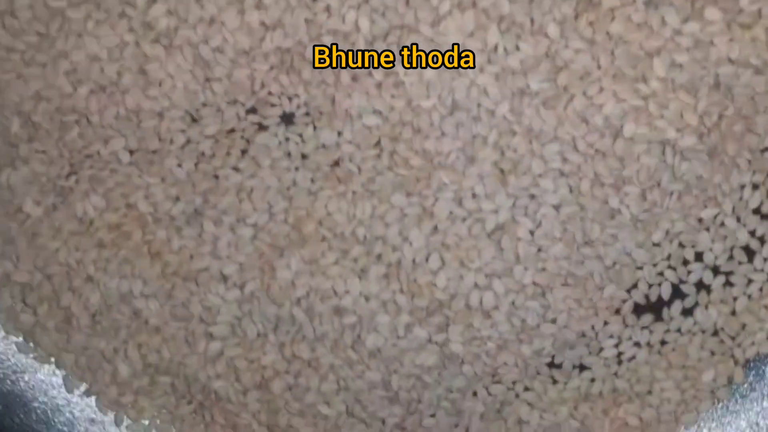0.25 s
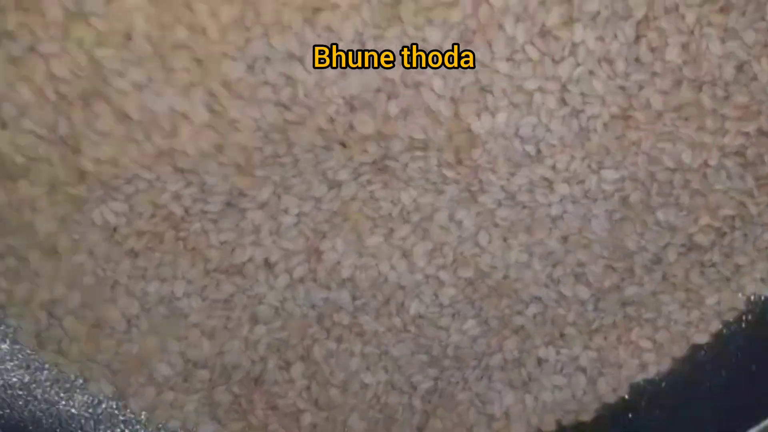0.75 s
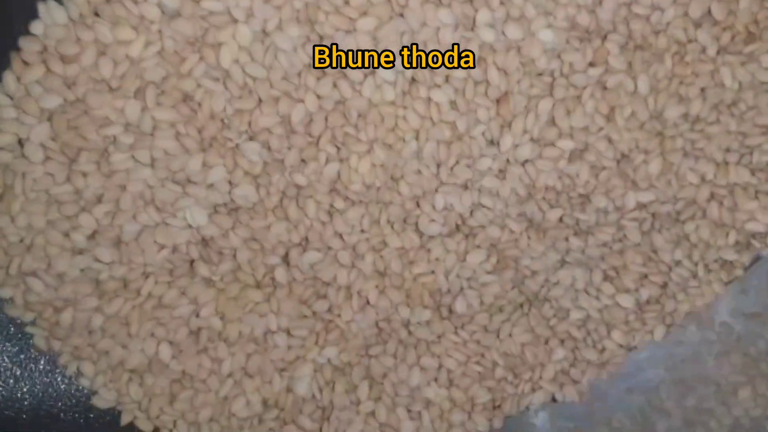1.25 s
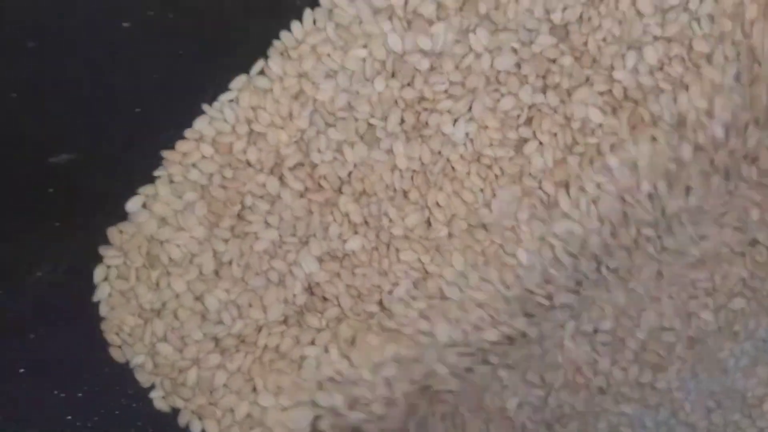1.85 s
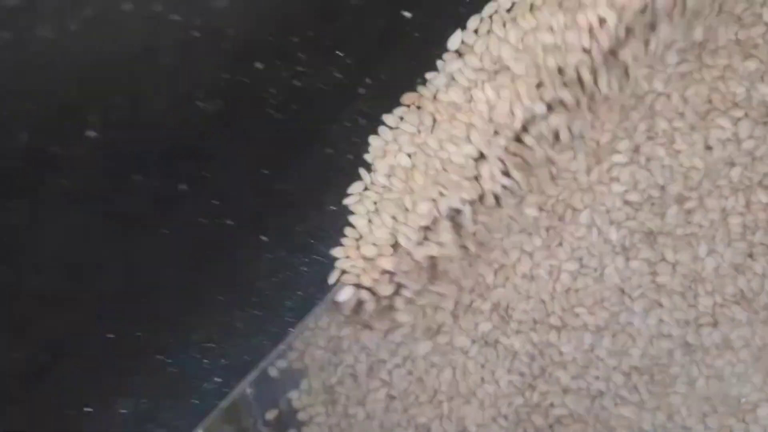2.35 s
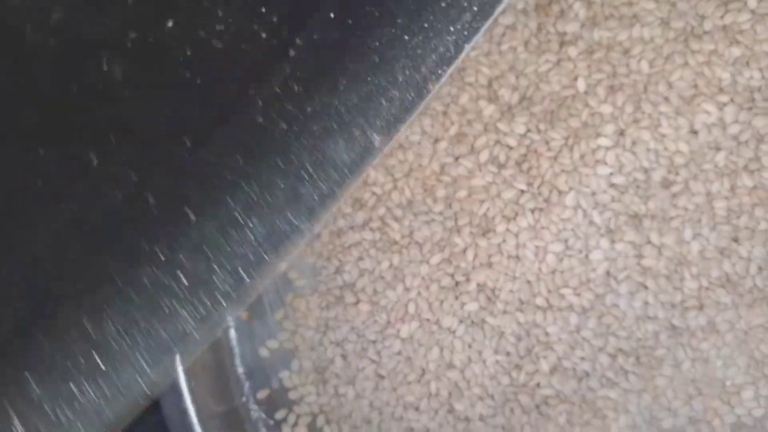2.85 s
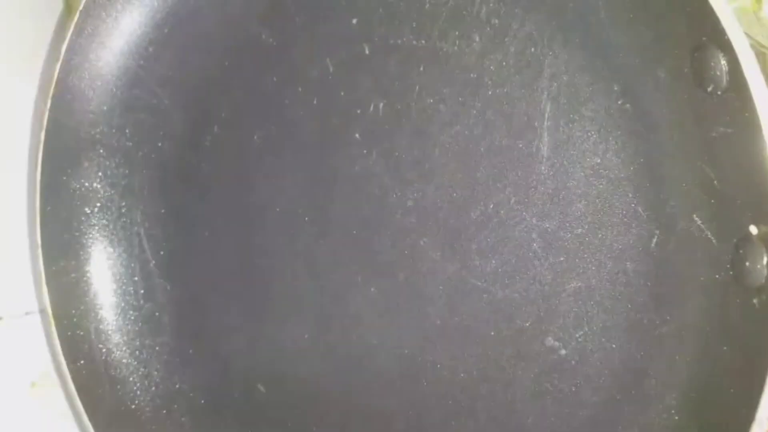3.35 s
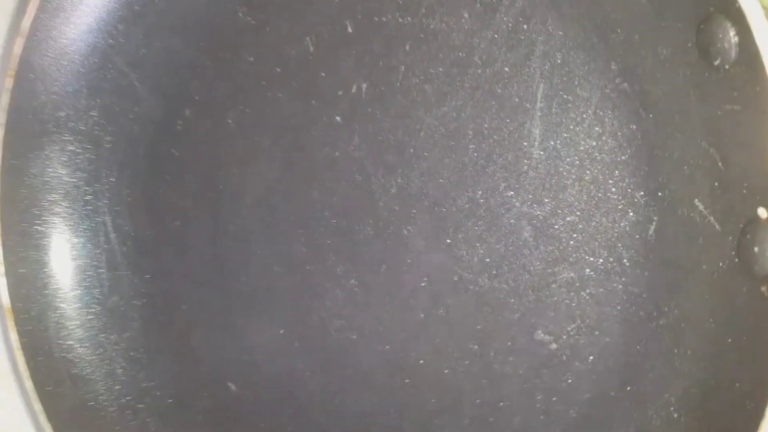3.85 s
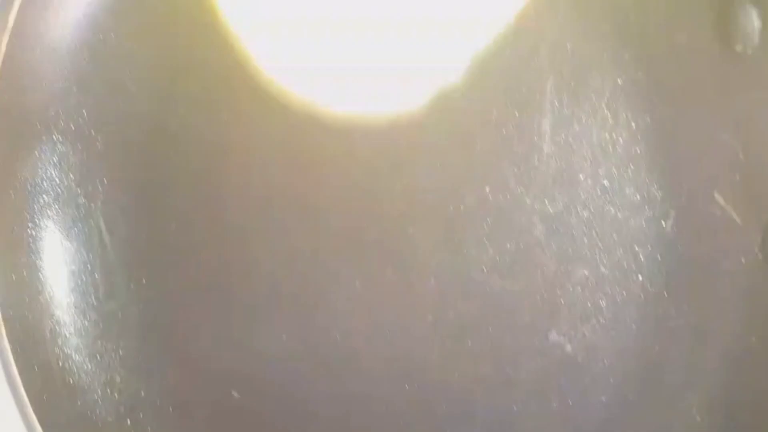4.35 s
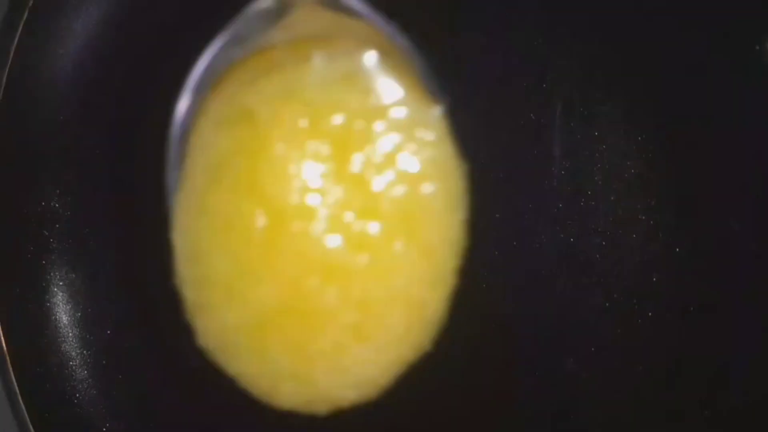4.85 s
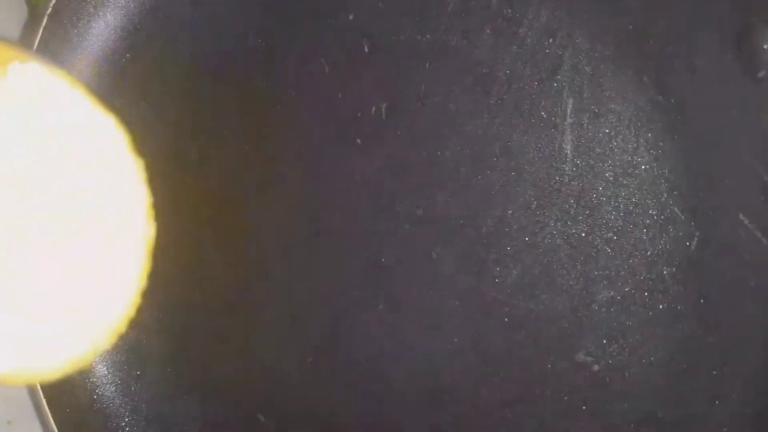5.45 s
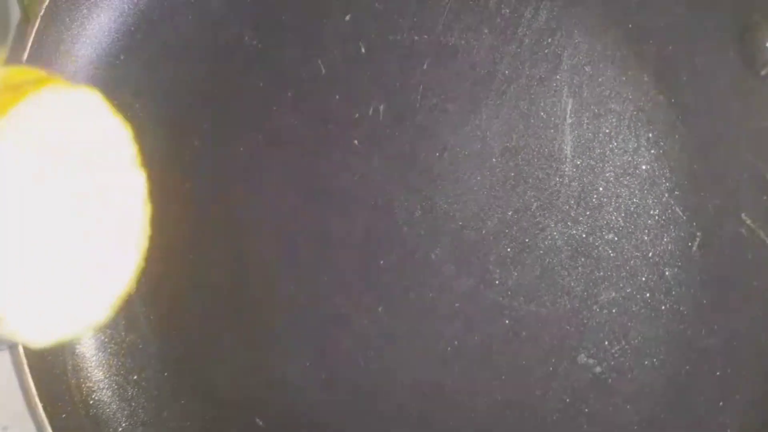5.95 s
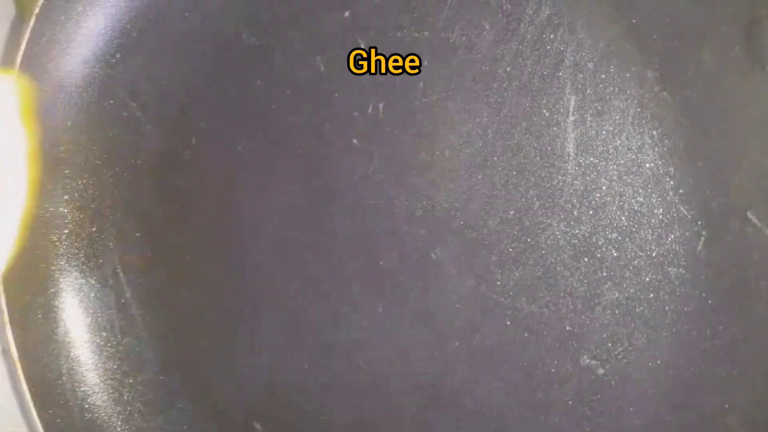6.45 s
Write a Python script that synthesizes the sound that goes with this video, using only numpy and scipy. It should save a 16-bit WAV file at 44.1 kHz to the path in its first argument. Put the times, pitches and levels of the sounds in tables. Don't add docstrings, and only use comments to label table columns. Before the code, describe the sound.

A deep mains-like hum dominates, picked up close by a phone in a small kitchen. Seeds slip over metal with a short ringing rasp, then rain down as countless tiny dry impacts, fading over a second. The sound drops out for an instant and returns with a small bump. Later the hum dies away into quiet room air with weak hum remnants, and soon kicks back in with a short airy rasp.

```python
import sys
import numpy as np
from scipy import signal
from scipy.fft import rfft, irfft, next_fast_len
from scipy.io import wavfile
from scipy.ndimage import uniform_filter1d, map_coordinates

SR = 44100
rng = np.random.default_rng(int(sys.argv[2]) if len(sys.argv) > 2 else 0)


def field_ratio(decibels):
    return 10 ** (np.asarray(decibels, dtype=float) / 20)


def output_pcm(signal):
    pcm = np.clip(np.atleast_2d(signal).T, -1, 1) * 32767
    wavfile.write(sys.argv[1], SR, np.round(pcm).astype(np.int16))


N = 296352
END_S = 6.8
TIME_S = np.arange(N) / SR

# (start [s], end [s], hum [Hz], time of a crest [s])
STRETCHES = [
    (0, 3.15, 99.95, 3.1197),
    (3.15, 5.41, 99.82, 3.1894),
    (5.41, 6.8, 99.89, 6.7108),
]
# (start [s], end [s])
SILENCE_S = (3.12245, 3.18381)
# (hum [dB], fan [dB], deep panels [dB], upper panels [dB])
RUN_LEVELS = [
    (-25, -54, -47, -45),
    (-27, -52.5, -39.5, -46),
    (-24.5, -52.5, -40, -46.5),
]
# (multiple of hum, level in stretches 1, 2, 3 [dB, dB, dB])
HUM_OVERTONES = [(2, -51, -47, -41), (3, -47.5, -48, -50.5), (4, -70.5, -65, -65), (5, -65.5, -59.5, -62),
                 (7, -63.5, -68.5, -65), (9, -76, -68.5, -71), (10, -71, -71.5, -74), (11, -80, -84, -86),
                 (12, -73.5, -72, -73.5), (14, -74.5, -69, -70), (15, -75, -77, -96),
                 (19, -76.5, -81, -73.5)]
# (time [s], length [s], level [dB])
IDLE_HUM = [
    (4.6, 0.13, -46),
    (4.84, 0.048, -48.5),
    (4.96, 0.041, -50.5),
    (5.16, 0.07, -55),
    (5.28, 0.037, -49),
    (5.43, 0.054, -55.5),
]
# (time [s], length [s], hum [dB], deep panels [dB], upper panels [dB])
CASING_JOLTS = [
    (0.097, 0.05, -40, -52, -44.5),
    (3.98, 0.16, -39, -53.5, -59),
    (5.542, 0.052, -38.5, -38, -45),
]
# (centre [Hz], width [Hz], level [dB])
DEEP_PANELS = [
    [(119.3, 27, 0), (162, 34, -7), (188, 20, -11.5)],
    [(124, 9.4, 3.5), (165, 12, -12), (167, 23, -3)],
    [(122, 13, -4), (167, 21, -12), (181, 67, -14)],
]
# (centre [Hz], width [Hz], level [dB])
UPPER_PANELS = [
    [(217, 61, 2), (262.5, 72, -3.5), (312.5, 136, 3.5), (403, 96, -11.5)],
    [(213, 30, 0.5), (253, 10, 1.5), (302, 66, -6), (380, 83, -7.5)],
    [(207, 61, -2.5), (247.4, 11, 3.5), (309, 49, -7), (373, 88, -8.5)],
]
# (frequency [Hz], density [dB/Hz])
DEEP_AIR = [(15, -18), (30, -20), (60, -7.5), (85, -5.5), (110, -15)]
DEEP_AIR_DB = [-58.5, -57.5, -59]
# (frequency [Hz], density [dB/Hz])
FAN_WHIRR = [
    [(250, -32.5), (430, -8), (607, -6.5), (705, -9.5), (749, -7.5), (938, -11.5), (1230, -11),
     (2600, -11.5), (4400, -25.5), (5030, -19.5), (6120, -13), (8130, -21.5), (9740, -36.5), (11800, -31.5),
     (15500, -45)],
    [(250, -37), (430, -26), (497, -12), (545, -7), (700, -9), (947, -13), (1230, -11.5), (1900, -15.5),
     (2720, -11), (4600, -20), (5680, -17.5), (6830, -25.5), (8210, -26.5), (10000, -49), (13000, -76),
     (22000, -120)],
    [(250, -33), (430, -12), (504, 3), (545, -7.5), (691, -4.5), (748, -8.5), (947, -13.5), (1250, -11),
     (1710, -12), (2790, -11), (3530, -17), (5680, -16), (8210, -24.5), (10000, -40), (13000, -74),
     (22000, -120)],
]
# (centre [Hz], width [Hz], level [dB])
HOUSING_RIDGES = [
    [(1197, 10, -19), (1710, 310, -7), (3920, 220, -2), (5980, 110, -1.5), (8150, 300, -12)],
    [(1280, 50, 0), (2345, 51, -4), (2684, 87, -7), (3220, 49, 1.5), (5390, 110, 1), (8000, 440, -8)],
    [(1293, 36, -0.5), (1400, 40, -8.5), (2380, 52, -2.5), (2770, 61, -4.5), (5420, 120, 0), (5940, 80, 2)],
]
# (time [s], length [s], level [dB])
FAN_STIRS = [
    (0.0, .06, -58.5),
    (5.3, 0.069, -67.5),
    (5.42, 0.12, -63),
]
# (onset [s], level [dB], t60 [s])
RASP_ONSETS = [
    (0.047, -47, 0.84),
    (5.51, -47, 0.7),
]
# (centre [Hz], width [Hz], level [dB])
RASP_MODES = [(890, 400, -4.5), (1710, 690, 0), (2090, 230, 0.5), (3240, 1600, -17.5), (4500, 2900, -17)]
# (time [s], length [s], centre [Hz], width [Hz], level [dB])
FAINT_STIRS = [(.15, .06, 340, 50, -47), (.36, .04, 7000, 2500, -66), (.875, .04, 1010, 50, -54),
               (1.75, .45, 1820, 130, -59.5), (.55, .13, 1000, 90, -62), (2.05, .3, 2300, 700, -62),
               (4.18, .06, 62, 30, -59), (4.3, .15, 7500, 1800, -72), (4.36, .08, 860, 50, -74),
               (4.62, .1, 350, 25, -65), (5.35, .12, 620, 80, -71), (5.32, .13, 1000, 250, -72),
               (5.65, .07, 65, 25, -55), (6.3, .08, 1450, 200, -63), (6.62, .13, 580, 40, -61)]
# (time [s], length [s], level [dB])
SEED_SLIDES = [
    (.55, 0.22, -62),
    (.79, 0.11, -44.5),
    (.875, 0.044, -43),
    (.94, 0.052, -47.5),
]
# (centre [Hz], width [Hz], level [dB])
PAN_MODES = [(1010, 92, -2.5), (1834, 104, -1.5), (2750, 130, -6.5), (3270, 65, -11.5), (4015, 76, -6.5),
             (4470, 69, 0), (5500, 46, -7), (5940, 73, -16), (6500, 130, -18), (7160, 100, -10),
             (7920, 110, -11), (8230, 81, -19), (9000, 64, -18), (11900, 250, -27), (13050, 250, -25)]
# (frequency [Hz], density [dB/Hz])
SEED_SCUFF = [(2500, -20), (4000, -5), (6500, -2), (8500, -8.5), (10000, -19), (12500, -17), (13800, -19),
              (15500, -10)]
# (time [s], hold [s], fall [dB/s], level [dB])
SEED_SURGES = [
    (.968, .02, 60, -46),
    (0.994, 0.043, 64, -38),
    (1.278, .01, 90, -53),
    (1.339, 0.036, 60, -45),
    (1.39, 0.15, 25.5, -42),
    (1.688, 0.22, 38.5, -49),
    (2.18, .03, 50, -59.5),
]
# (centre [Hz], width [Hz], level [dB])
TRAY_MODES = [(1820, 90, -4), (4440, 250, -3), (5235, 90, 1), (6050, 220, -1), (7300, 150, -5),
              (7920, 200, -3), (10600, 100, -13), (11700, 250, -12), (12800, 150, -7), (13800, 220, -12),
              (14800, 200, -10)]
# (frequency [Hz], density [dB/Hz])
PATTER_BODY = [(530, -55), (900, -15), (1420, -27.5), (1770, -4), (2340, -6.5), (3170, 0), (4120, 0),
               (4420, 2), (4840, 1), (5980, 3), (6550, 0), (8180, 1), (10000, -16), (13000, -48),
               (22000, -120)]
# (frequency [Hz], density [dB/Hz])
PATTER_SPARKLE = [(5880, -52), (10000, -33), (10400, -2.5), (11000, -13), (11300, -0.5), (12600, 3),
                  (14900, 1), (15500, 8.5)]
# (time [s], level [dB])
DRY_TICKS = [
    (4.298, -52.5),
    (5.885, -55),
    (2.205, -55),
    (1.303, -45),
]
# (frequency [Hz], density [dB/Hz])
ROOM_TONE = [(20, -28), (65, -7), (85, -13), (165, 2), (280, -12), (430, -8.5), (600, -20), (1400, -27.5),
             (2000, -23), (4000, -18.5), (5800, -19), (8300, -24), (10000, -40), (15500, -34)]
# (centre [Hz], width [Hz], level [dB])
ROOM_MODES = [(4190, 74, -4), (5640, 180, .4), (5880, 26, 3.5), (6180, 160, -0.5), (7850, 36, -5)]
# (time [s], length [s], level [dB])
HISS_PUFFS = [
    (3.36, .12, -81),
    (4.05, 0.4, -73.5),
    (4.8, 0.55, -80.5),
    (5.9, .3, -74),
    (6.4, .3, -79),
]
# (frequency [Hz], density [dB/Hz])
THIN_HISS = [(5590, -37), (9500, -10), (11600, -7.5), (12700, -1), (14000, -13), (14900, 3), (15500, 0)]

ON_S, OFF_S = (0.018, 5.49), 4.082
RISE_S = (0.07, 0.054)
FAN_FADE_DB_PER_S, DEEP_FADE_DB_PER_S, UPPER_FADE_DB_PER_S = 53, 50, 70
DEEP_IDLE_DB, UPPER_IDLE_DB = -78, -65.5
FIELD_DELAY_S, FIELD_RISE_S = (0.13, 0.091), (0.11, 0.12)
LINGER_S, SWING_S, REBOUND, FADE_S = 0.021, 0.044, 3.2, 0.081
SETTLE_S, SETTLE_TIME_S, EDGE_DB_PER_OCTAVE, DEEPEN_DB = 2, 0.15, 2, 2
SLIDE_END_S = 0.98
SURGE_RISE_DB_PER_S, BRIGHT_DB, DULL_S, DULL_DB_PER_S = 598, -8.5, 2.5, 48
TOP_HZ = 15550
RETURN_DB, RETURN_S = -28, 0.003


def unit(x):
    return x / np.sqrt(np.mean(x ** 2) + 1e-20)


def during(start_s, end_s):
    samples = np.arange(N)
    return (samples >= start_s * SR) & (samples < end_s * SR)


def wobble(rate_hz):
    knots = rng.standard_normal(int(N * rate_hz / SR) + 4)
    return map_coordinates(knots, [np.arange(N) * rate_hz / SR])


def swells(rows):
    power = sum(field_ratio(2 * db) * np.exp(-2 * ((TIME_S - s) / length_s) ** 2) for s, length_s, db in rows)
    return np.sqrt(power)


def filtered(x, response):
    size = next_fast_len(N + 8192)
    return irfft(rfft(x, size) * response(np.fft.rfftfreq(size, 1 / SR)), size)[:N]


def slope(points):
    hz, db = np.transpose(points)
    return lambda f: field_ratio(np.interp(np.log(f + 1), np.log(hz + 1), db, left=-120, right=-120))


def resonances(modes):
    def response(f):
        power = 0
        for centre, width, db in modes:
            damping = (f * width) ** 2
            power = power + field_ratio(2 * db) * (damping / ((centre ** 2 - f ** 2) ** 2 + damping)) ** 2
        return np.sqrt(power)
    return response


def ridged(points, modes, lift_db):
    return lambda f: slope(points)(f) * np.sqrt(1 + (field_ratio(lift_db) * resonances(modes)(f)) ** 2)


def patchy(x, patchy_db):
    z = signal.stft(x, nperseg=512)[2]
    patches = uniform_filter1d(rng.standard_normal(z.shape), 6, 0)
    patches = uniform_filter1d(patches, 12, 1)
    return signal.istft(z * field_ratio(patchy_db * unit(patches)), nperseg=512)[1][:N]


def rush(response, patchy_db):
    return unit(filtered(patchy(rng.standard_normal(N), patchy_db), response))


def hail(rate_hz, spread_db, share):
    size = field_ratio(spread_db * np.minimum(rng.exponential(size=N), 2))
    hits = (rng.random(N) < rate_hz / SR) * size * np.sign(rng.standard_normal(N))
    return np.sqrt(share) * unit(hits) + np.sqrt(1 - share) * rng.standard_normal(N)


def envelope(fade_db_per_s):
    first, second = [1 - np.exp(-np.maximum(TIME_S - s, 0) / rise_s) for s, rise_s in zip(ON_S, RISE_S)]
    return np.maximum(first * field_ratio(-fade_db_per_s * np.maximum(TIME_S - OFF_S, 0)), second)


def motor_load():
    return envelope(FAN_FADE_DB_PER_S) ** 1.7


def settled():
    return during(0, SILENCE_S[0]) * (1 + np.tanh((TIME_S - SETTLE_S) / SETTLE_TIME_S)) / 2


def hum_phase(hz, crest_s):
    return 2 * np.pi * hz * (TIME_S - crest_s)


def jolts(column):
    return swells([(row[0], row[1], row[column]) for row in CASING_JOLTS])


def fan():
    out = np.zeros(N)
    speed, stir = envelope(FAN_FADE_DB_PER_S), swells(FAN_STIRS)
    for k, (start_s, end_s, hz, crest_s) in enumerate(STRETCHES):
        gain = field_ratio(RUN_LEVELS[k][1]) * speed + stir
        buzz = 1 + 0.08 * np.cos(2 * hum_phase(hz, crest_s))
        air = rush(ridged(FAN_WHIRR[k], HOUSING_RIDGES[k], lift_db=8.5), patchy_db=0.7)
        out += during(start_s, end_s) * gain * buzz * air
    return out


def casing():
    out = np.zeros(N)
    deep, upper = envelope(DEEP_FADE_DB_PER_S), envelope(UPPER_FADE_DB_PER_S)
    deep_floor = jolts(3) + field_ratio(DEEP_IDLE_DB)
    upper_floor = jolts(4) + field_ratio(UPPER_IDLE_DB)
    for k, (start_s, end_s, *_) in enumerate(STRETCHES):
        deep_db, upper_db = RUN_LEVELS[k][2:]
        deep_gain = field_ratio(deep_db + DEEPEN_DB * settled()) * deep + deep_floor
        upper_gain = field_ratio(upper_db) * upper + upper_floor
        rumble = deep_gain * rush(resonances(DEEP_PANELS[k]), patchy_db=0.0)
        rumble += upper_gain * rush(resonances(UPPER_PANELS[k]), patchy_db=-0.5)
        rumble += motor_load() * field_ratio(DEEP_AIR_DB[k]) * rush(slope(DEEP_AIR), patchy_db=1.5)
        out += during(start_s, end_s) * rumble
    return out


def magnetic_field():
    first, second = [1 - np.exp(-np.maximum(TIME_S - s - wait_s, 0) / rise_s)
                     for s, wait_s, rise_s in zip(ON_S, FIELD_DELAY_S, FIELD_RISE_S)]
    off_s = np.maximum(TIME_S - OFF_S - LINGER_S, 0)
    swing = (1 + REBOUND) * np.exp(-off_s / SWING_S) - REBOUND * np.exp(-off_s / FADE_S)
    return first * swing + second


def hum():
    out = np.zeros(N)
    strength, jolt, idle = magnetic_field(), jolts(2), swells(IDLE_HUM)
    load, edge = motor_load(), EDGE_DB_PER_OCTAVE * settled()
    for k, (start_s, end_s, hz, crest_s) in enumerate(STRETCHES):
        phase = hum_phase(hz, crest_s)
        gain = field_ratio(RUN_LEVELS[k][0]) * strength + jolt - idle
        tone = field_ratio(3) * gain * np.cos(phase + 0.04 * wobble(12))
        for row in HUM_OVERTONES:
            multiple = row[0]
            level_db = row[k + 1] + 3 + edge * np.log2(multiple / 3) + 2.0 * wobble(5)
            drift = rng.uniform(0, 2 * np.pi) + 0.69 * wobble(4)
            tone += load * field_ratio(level_db) * np.cos(multiple * phase + drift)
        out += during(start_s, end_s) * tone
    return out


def start_ups():
    swell = 0
    for onset_s, db, t60_s in RASP_ONSETS:
        slow_s = np.where(TIME_S > onset_s, t60_s, 0.06)
        swell = swell + field_ratio(db - 60 * np.abs(TIME_S - onset_s) / slow_s)
    return swell * rush(resonances(RASP_MODES), patchy_db=0.0)


def stirrings():
    return sum(swells([(s, length_s, db)]) * rush(resonances([(hz, width_hz, 0)]), patchy_db=0.5)
               for s, length_s, hz, width_hz, db in FAINT_STIRS)


def sliding_seeds():
    rub = patchy(hail(rate_hz=2500, spread_db=3, share=0.4), patchy_db=1.3)
    ring = unit(filtered(rub, resonances(PAN_MODES)))
    scuff = field_ratio(-10.0) * unit(filtered(rub, slope(SEED_SCUFF)))
    flutter_db = 0.89 * wobble(30.9) - 800 * np.maximum(TIME_S - SLIDE_END_S, 0)
    return swells(SEED_SLIDES) * field_ratio(flutter_db) * (ring + scuff)


def pouring_seeds():
    power = 0
    for s, hold_s, fall_db_per_s, db in SEED_SURGES:
        rise_db = SURGE_RISE_DB_PER_S * np.maximum(s - TIME_S, 0)
        fall_db = fall_db_per_s * np.maximum(TIME_S - s - hold_s, 0)
        power = power + field_ratio(2 * (db - rise_db - fall_db))
    clumps = field_ratio(0.4 * wobble(28) + 0.8 * wobble(70))
    grains = patchy(hail(rate_hz=2200, spread_db=3.5, share=0.46) * clumps, patchy_db=0.25)
    body = unit(filtered(grains, ridged(PATTER_BODY, TRAY_MODES, lift_db=5.5)))
    sparkle = unit(filtered(grains, ridged(PATTER_SPARKLE, TRAY_MODES, lift_db=13.0)))
    bright_db = BRIGHT_DB - DULL_DB_PER_S * np.maximum(TIME_S - DULL_S, 0)
    return np.sqrt(power) * (body + field_ratio(bright_db) * sparkle)


def ticks():
    blows = np.zeros(N)
    for s, db in DRY_TICKS:
        blows[round(s * SR)] = field_ratio(db + 9.5)
    return filtered(blows, slope([(3000, -36), (8000, -6), (13000, 10), (16000, -6.0)]))


def room():
    tone = field_ratio(-57) * rush(ridged(ROOM_TONE, ROOM_MODES, lift_db=9.5), patchy_db=0.5)
    hiss = swells(HISS_PUFFS) * rush(slope(THIN_HISS), patchy_db=0.0)
    return during(SILENCE_S[1], END_S) * (tone + hiss)


def scene():
    appliance = fan() + casing() + hum() + start_ups()
    seeds = sliding_seeds() + pouring_seeds()
    kitchen = stirrings() + ticks() + room()
    return (appliance + seeds + kitchen)[None]


def band_limit(x):
    return signal.sosfilt(signal.butter(12, 16240, fs=SR, output="sos"), x)


def record(dry):
    x = filtered(dry[0], lambda hz: hz < TOP_HZ) * ~during(*SILENCE_S)
    since_s = TIME_S - SILENCE_S[1]
    push = (since_s >= 0) * field_ratio(RETURN_DB) * np.exp(-np.abs(since_s) / RETURN_S)
    blip = 0.009 * during(SILENCE_S[1] - 0.0014, SILENCE_S[1] - 0.0011)
    mix = (x - push - blip)[None]
    return band_limit(mix)


dry = scene()
out = record(dry)
output_pcm(out)
```